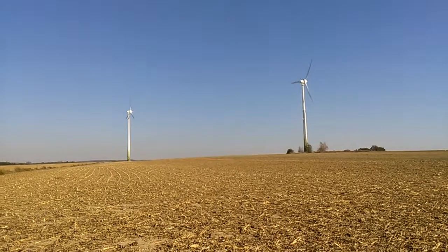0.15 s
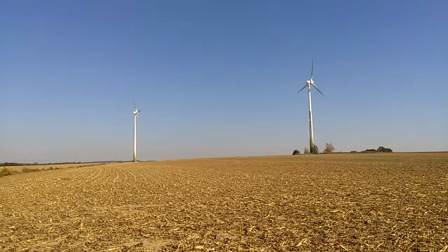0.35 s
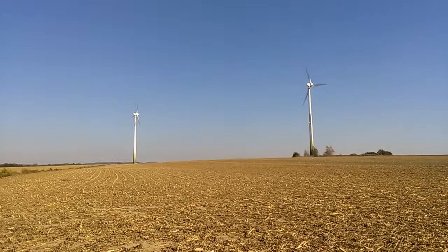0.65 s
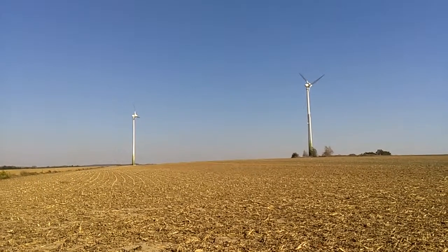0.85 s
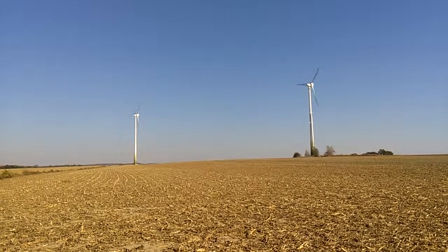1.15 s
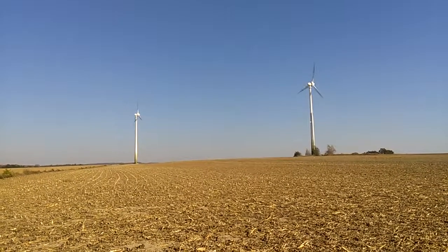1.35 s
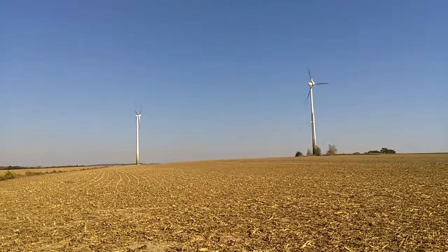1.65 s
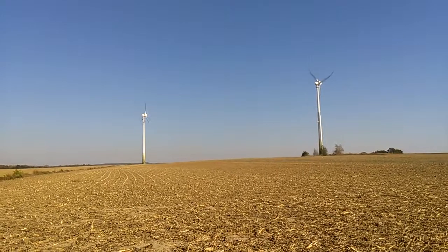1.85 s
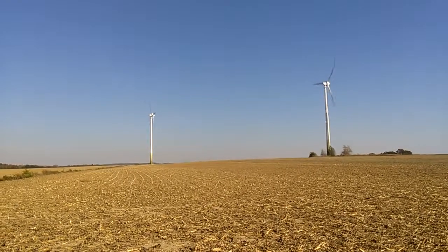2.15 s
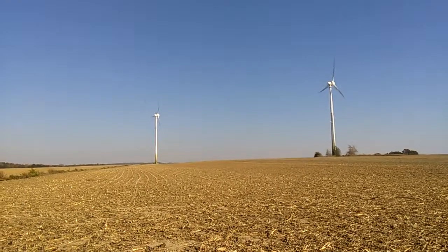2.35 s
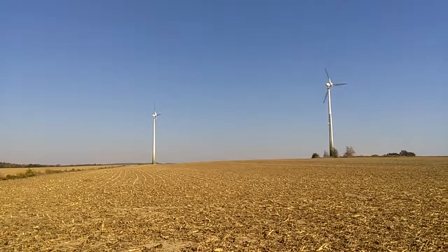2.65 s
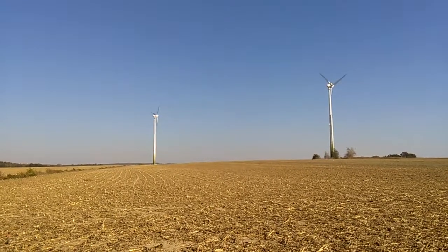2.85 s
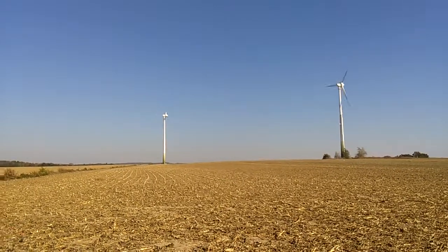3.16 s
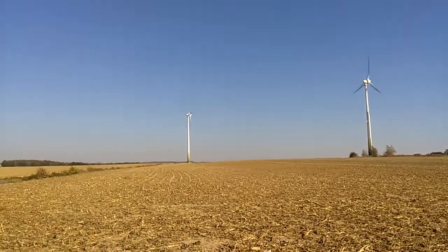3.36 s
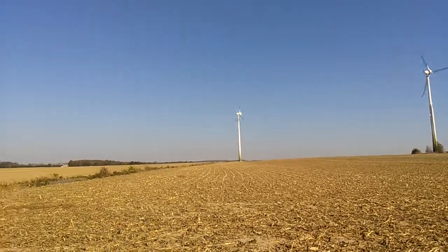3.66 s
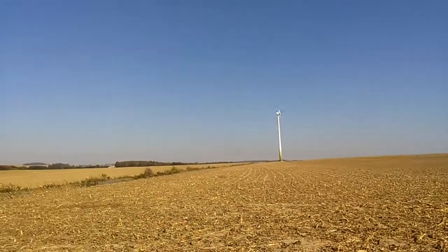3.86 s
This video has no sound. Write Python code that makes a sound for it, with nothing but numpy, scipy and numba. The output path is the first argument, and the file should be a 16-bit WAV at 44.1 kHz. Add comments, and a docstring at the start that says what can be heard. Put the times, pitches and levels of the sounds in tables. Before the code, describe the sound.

Wind buffets an unprotected microphone in uneven, bassy gusts with dull pops, heaviest early on; in the lulls, soft turbine blade swishes recur about every two thirds of a second over a low distant drone.

```python
"""Open stubble field under wind turbines: each passing blade makes a soft swish over a steady distant drone.
Gusts buffet the microphone: rumble from low-passed noise with a moving edge, ragged spray, dull pulse pops.
Swish, drone, dry-stubble hiss and faint handling rustles are spectrally shaped noise with flickering bands.
A thin high tone, perhaps an insect, comes in halfway: a sine of slightly wandering pitch."""
import sys
import numpy as np
from scipy import signal
from scipy.fft import rfft, irfft
from scipy.io import wavfile
from scipy.ndimage import uniform_filter1d
from numba import njit

SR = 44100
rng = np.random.default_rng(int(sys.argv[2]) if len(sys.argv) > 2 else 0)


def master(y):
    """Save y as 16-bit WAV."""
    cut = np.clip(np.atleast_2d(y).T, -1, 1)
    pcm = np.round(cut * 32767)  # scale
    wavfile.write(sys.argv[1], SR, pcm.astype(np.int16))


N = 176400
TIME_S = np.arange(N) / SR

# Wind pressure on the microphone, before the gain trim: time_s, level_db
WIND_PRESSURE = [(0.0, -19.5), (0.17, -27), (0.24, -17.5), (0.38, -26), (0.49, -15), (0.53, -29),
                 (0.56, -15.5), (0.63, -34.5), (0.66, -23), (0.69, -29.5), (0.72, -16), (0.75, -30),
                 (0.79, -22.5), (0.82, -29.5), (0.87, -25), (0.99, -40), (1.06, -36.5), (1.11, -20.5),
                 (1.28, -19.5), (1.41, -28.5), (1.45, -36.5), (1.48, -46.5), (1.61, -66), (1.65, -63),
                 (1.68, -24), (1.71, -25.5), (1.82, -36), (1.84, -30), (1.92, -25.5), (1.95, -30),
                 (1.98, -32), (2.05, -47), (2.09, -60), (2.12, -33), (2.25, -33.5), (2.27, -20),
                 (2.32, -33.5), (2.38, -21.5), (2.49, -28.5), (2.52, -22), (2.58, -31), (2.7, -18.5),
                 (2.86, -17.5), (2.88, -26.5), (2.94, -29), (3.01, -49.5), (3.2, -52), (3.26, -39),
                 (3.3, -63), (3.33, -37), (3.38, -51), (3.44, -30.5), (3.49, -39), (3.61, -25.5),
                 (3.64, -44), (3.72, -26.5), (3.89, -52.5), (3.93, -31), (3.95, -27), (4.0, -43.5)]
# Surges of faster, finer eddies: centre_s, half_length_s (to 1/e), edge_rise_octaves
EDDY_SURGES = [(0.232, 0.016, 0.79), (0.284, 0.026, 0.71), (0.472, 0.058, 0.93), (0.61, 0.086, 0.42),
               (1.258, 0.077, 0.74), (1.33, 0.0083, 0.74), (1.681, 0.01, 0.61), (1.76, 0.019, 0.82),
               (1.869, 0.031, .5), (2.306, 0.073, 0.18), (2.619, 0.046, 0.74), (2.764, 0.074, 1.2),
               (2.893, 0.038, 0.32), (3.425, 0.022, 0.45), (3.926, 0.016, 0.27)]
# Single eddies popping on the port: centre_s, gain_db, time_scale_s
EDDY_POPS = [(0.215, -25, 0.00099), (0.233, -32, 0.00079), (0.242, -24.5, .0006), (0.275, -23, 0.00073),
             (.438, -18.5, 0.001), (.457, -39, 0.00045), (.466, -20, 0.00056), (0.481, -25, 0.00053),
             (0.507, -15.5, 0.0011), (0.565, -17.5, 0.002), (1.198, -17.5, 0.00093), (1.202, -32, 0.00048),
             (1.219, -25.5, 0.00084), (1.246, -23, 0.0013), (1.309, -35, 0.00056), (1.344, -25.5, 0.00084),
             (2.123, -15, 0.004), (2.275, -22.5, 0.0015), (2.329, -16, 0.0026), (2.512, -19.5, 0.0018),
             (2.559, -25, 0.0011), (2.614, -26.5, .0009), (2.698, -23.5, 0.00059), (2.716, -13.5, 0.00092),
             (2.773, -14, 0.0012), (2.797, -18, 0.0011), (2.855, -18, 0.00095), (3.566, -20, 0.00071),
             (3.774, -27.5, 0.00086)]
# Turbulent spray spectrum, relative: frequency_hz, density_db (per Hz)
SPRAY_SPECTRUM = [(300, -7), (700, 3), (1200, -5), (1600, -15.5), (2500, -29), (5000, -50)]
# Blade passes: peak_s, level_db
BLADE_PASSES = [(0.191, -55.5), (0.822, -56.5), (1.515, -58), (2.18, -56.5), (2.878, -61), (3.51, -58)]
# Blade swish spectrum, relative: frequency_hz, density_db (per Hz)
SWISH_SPECTRUM = [(300, 0), (560, 2), (780, 3), (1000, -5.5), (1170, 2), (1550, -4), (1800, -3), (2180, -6),
                  (2500, -3.5), (2630, -1.5), (2770, -17.5), (3200, -16.5), (3400, -21.5), (3900, -20.5),
                  (4250, -19.5), (5200, -27.5), (14000, -51.5)]
# Stubble hiss level: time_s, level_db
HISS_LEVEL = [(0, -67.5), (.22, -71), (.48, -71), (.67, -69.5), (.76, -71), (.85, -62.5), (.97, -72.5),
              (1.1, -73), (1.38, -72), (1.56, -68), (1.75, -75), (2.03, -75.5), (2.2, -68.5), (2.42, -72.5),
              (2.75, -69), (2.88, -67.5), (3.14, -73.5), (3.36, -70), (3.51, -66.5), (3.75, -70),
              (3.87, -67), (4, -73)]
# Stubble hiss spectrum, relative: frequency_hz, density_db (per Hz)
HISS_SPECTRUM = [(2800, -13.5), (4000, -8), (5000, -15), (6400, -7), (7500, -0.5), (8200, -0.5), (9200, -5),
                 (11000, -13), (14000, -24)]
# Thin tone level, before its wander: time_s, level_db
TONE_LEVEL = [(0, -100), (2.1, -103), (2.25, -83), (2.6, -84), (2.68, -81), (2.8, -78), (2.89, -65.5),
              (3.0, -90), (3.05, -77), (3.13, -79), (3.43, -82), (3.51, -66), (3.56, -89), (3.6, -72),
              (3.72, -70), (3.77, -88), (3.86, -78), (3.92, -92)]
# Brief handling rustles: centre_s, half_length_s (to 1/e), level_db
RUSTLE_EVENTS = [(3.811, .016, -70), (3.962, 0.049, -70.5)]
# Handling rustle spectrum, relative: frequency_hz, density_db (per Hz)
RUSTLE_SPECTRUM = [(1500, -4), (2500, 2), (4000, 3), (5700, -5), (7500, -12), (14000, -18)]
# Distant drone spectrum, relative: frequency_hz, density_db (per Hz)
DRONE_SPECTRUM = [(25, -23), (45, 6.5), (62, 21), (100, -1), (160, -12), (190, -1), (290, -9.5),
                  (470, -17.5), (650, -14.5), (880, -11.5), (1300, -25.5), (2500, -26.5), (3100, -33.5),
                  (5000, -43), (14000, -42.5)]

# Rumble edge at the usual pressure, and its rise with pressure
EDDY_HZ, EDDY_OCT_PER_DB, USUAL_DB = 112.8, 0.018, -27.5
WIND_GAIN_DB, PORT_CUT_HZ = -0.5, 50
FLUTTER_OCT, FLUTTER_DB, FLUTTER_HZ = 0.23, 2.5, 42.8
# Spray level at a one-octave surge, exponent on the surge, flicker
SPRAY_DB, SPRAY_EXPONENT, SPRAY_ROUGH_DB = -59, 2.0, 4.5
SWISH_RISE_S, SWISH_FALL_S, SWISH_ROUNDNESS = 0.13, 0.1, 1.7  # times to 1/e power
ECHO_S, ECHO_SHARE, ECHO_CUT_HZ = 0.0092, 0.2, 1100
TONE_HZ, TONE_WANDER_HZ = 8121, 4
DRONE_DB = -48
DUCK_ABOVE_DB, DUCK_SHARE, DUCK_S = -24.5, 0.32, 0.022
CUTOFF_HZ = 14250


def from_db(db):
    """Decibels to gain."""
    return 10 ** (np.asarray(db) / 20)


def rms_one(x):
    """Scale to unit rms."""
    return x / np.sqrt(np.mean(x ** 2) + 1e-20)


def in_time(rows):
    """Join curve points by straight lines."""
    return np.interp(TIME_S, *np.transpose(rows))


def drift(rate_hz):
    """Random wander of unit rms: noise through two equal poles at rate_hz."""
    step = 40  # samples between drawn values
    pole = np.exp(-2 * np.pi * rate_hz * step / SR)
    noise = rng.standard_normal(N // step + 2002)
    slow = signal.lfilter([1], [1, -2 * pole, pole * pole], noise)[2000:]  # drop the filter's start-up
    return np.interp(np.arange(N) / step, np.arange(len(slow)), rms_one(slow))


def lowpass(x, order, cut_hz):
    """Butterworth low-pass."""
    return signal.sosfilt(signal.butter(order, cut_hz, fs=SR, output="sos"), x)


def coloured_noise(spectrum, patchy_db, patch_rate_hz):
    """Unit-rms noise of a given spectrum; overlapping bands flicker independently."""
    hz, db = np.transpose(spectrum)
    octave = np.log2(np.maximum(np.arange(N // 2 + 1) * SR / N, 1))
    colour = rfft(rng.standard_normal(N)) * from_db(np.interp(octave, np.log2(hz), db))
    out = 0
    for centre in np.arange(4.5, 14.5, 0.5):  # half-octave spacing, log2 of Hz
        triangle = np.maximum(0, 1 - 2 * abs(octave - centre))
        band = irfft(colour * triangle, N)
        out = out + band * from_db(patchy_db * drift(patch_rate_hz))
    return rms_one(out)


@njit
def moving_lowpass(x, step, damping):
    """Two-pole low-pass whose edge moves from sample to sample."""
    out, low, band = np.zeros(len(x)), 0., 0.
    for i in range(len(x)):
        low += step[i] * band
        band += step[i] * (x[i] - low - damping * band)
        out[i] = low
    return out


def port(x):
    """The microphone loses the deepest bass."""
    return signal.sosfilt(signal.butter(3, PORT_CUT_HZ, "high", fs=SR, output="sos"), x)


def surge_octaves():
    """Faster, finer eddies raise the rumble's edge in brief surges."""
    return sum(rise * np.exp(-((TIME_S - s) / length_s) ** 2) for s, length_s, rise in EDDY_SURGES)


def buffeting(damping=1.424, top_hz=1400, even_s=0.032):
    """Turbulence at the microphone: stronger, faster air brings finer eddies and a higher edge."""
    level_db = in_time(WIND_PRESSURE)
    pressure_oct = EDDY_OCT_PER_DB * (level_db - USUAL_DB)
    edge_hz = EDDY_HZ * 2 ** (pressure_oct + surge_octaves() + FLUTTER_OCT * drift(FLUTTER_HZ))
    step = 2 * np.pi * np.minimum(edge_hz, SR / 20) / SR
    eddies = moving_lowpass(rng.standard_normal(N), step, damping)
    eddies = moving_lowpass(eddies, step, damping)
    eddies = port(lowpass(eddies, 2, top_hz))
    # Even out the short-term power, then impose the wind level
    power = uniform_filter1d(eddies ** 2, int(even_s * SR))
    power = uniform_filter1d(power, int(even_s * SR / 2))
    gain_db = level_db + WIND_GAIN_DB + FLUTTER_DB * drift(FLUTTER_HZ / 2)
    return eddies / np.sqrt(power + 1e-18) * from_db(gain_db)


def spray():
    """The fastest air adds a ragged splash of fine turbulence, growing steeply with the surge."""
    level = from_db(SPRAY_DB + SPRAY_ROUGH_DB * drift(70)) * np.abs(surge_octaves()) ** SPRAY_EXPONENT
    return level * coloured_noise(SPRAY_SPECTRUM, patchy_db=3, patch_rate_hz=31)


def pops():
    """A lone eddy gives one quick suck and push of pressure."""
    out = 0
    for s, gain_db, scale_s in EDDY_POPS:
        u = (TIME_S - s) / scale_s
        out = out + from_db(gain_db) * 2 * u * np.exp(-u ** 2)
    return out


def blades():
    """Trailing-edge noise swells and fades with each blade pass; overlapping passes add in power."""
    power = 0
    for s, level_db in BLADE_PASSES:
        span_s = np.where(TIME_S < s, SWISH_RISE_S, SWISH_FALL_S)
        power = power + from_db(level_db) ** 2 * np.exp(-abs((TIME_S - s) / span_s) ** SWISH_ROUNDNESS)
    return np.sqrt(power) * coloured_noise(SWISH_SPECTRUM, patchy_db=3.0, patch_rate_hz=36)


def stubble():
    """Dry stubble in the breeze: fine high hiss that rises and falls."""
    return from_db(in_time(HISS_LEVEL)) * coloured_noise(HISS_SPECTRUM, patchy_db=2.3, patch_rate_hz=17)


def insect():
    """Thin tone, perhaps an insect: a sine with slight pitch and level wander."""
    phase = 2 * np.pi * np.cumsum(TONE_HZ + TONE_WANDER_HZ * drift(49)) / SR
    return from_db(in_time(TONE_LEVEL) + 2 * drift(20)) * rms_one(np.sin(phase))


def rustles():
    """Faint short scuffs, perhaps a hand moving at the recorder: bursts of shaped noise."""
    level = sum(from_db(db) * np.exp(-((TIME_S - s) / length_s) ** 2) for s, length_s, db in RUSTLE_EVENTS)
    return level * coloured_noise(RUSTLE_SPECTRUM, patchy_db=3, patch_rate_hz=80)


def drone():
    """Steady far noise of the turbines and the open country."""
    return from_db(DRONE_DB) * coloured_noise(DRONE_SPECTRUM, patchy_db=0.4, patch_rate_hz=6)


def reflected(x):
    """A short, dull echo ripples the spectrum."""
    dull = lowpass(x, 1, ECHO_CUT_HZ)
    return x + ECHO_SHARE * np.interp(TIME_S - ECHO_S, TIME_S, dull, left=0)


def scene():
    """All sources at one microphone."""
    wind = port(buffeting() + spray() + pops())
    turbines = reflected(blades() + drone())
    return (wind + turbines + stubble() + insect() + rustles())[None]


def record(dry):
    """Gain control dips in the loudest gusts; the top is cut steeply."""
    size = int(DUCK_S * SR)
    power = uniform_filter1d(uniform_filter1d(dry ** 2, size), size)
    level_db = 10 * np.log10(power + 1e-12)
    ducked = dry * from_db(-DUCK_SHARE * np.maximum(level_db - DUCK_ABOVE_DB, 0))
    return signal.sosfilt(signal.ellip(12, 0.1, 80, CUTOFF_HZ, fs=SR, output="sos"), ducked)


dry = scene()
out = record(dry)
master(out)
```